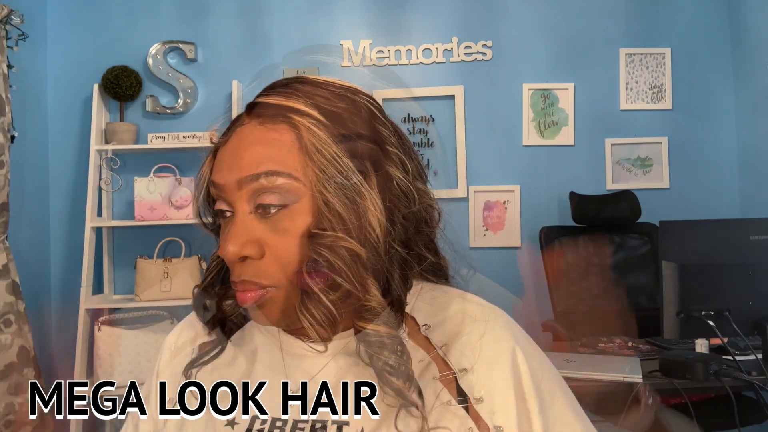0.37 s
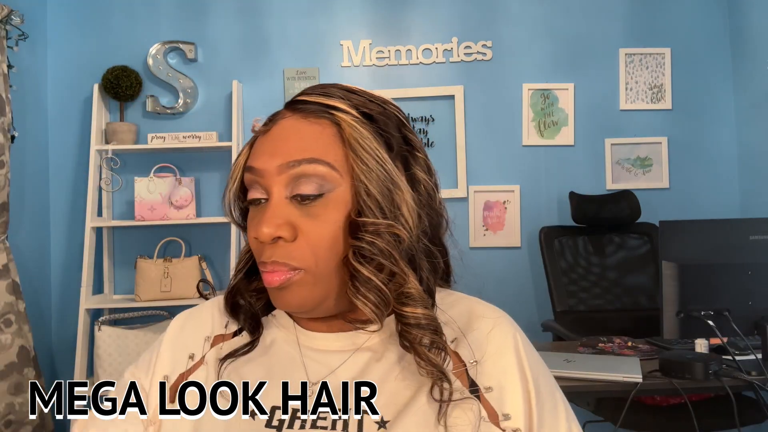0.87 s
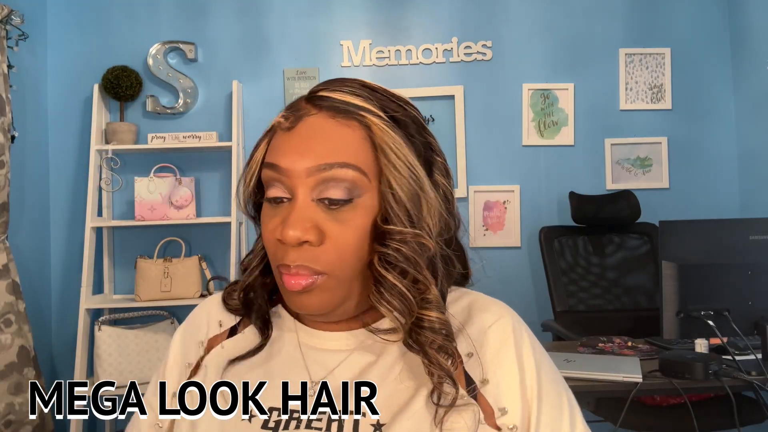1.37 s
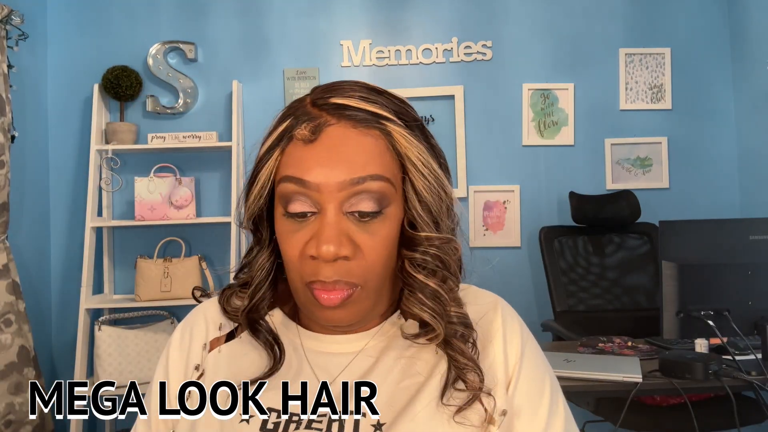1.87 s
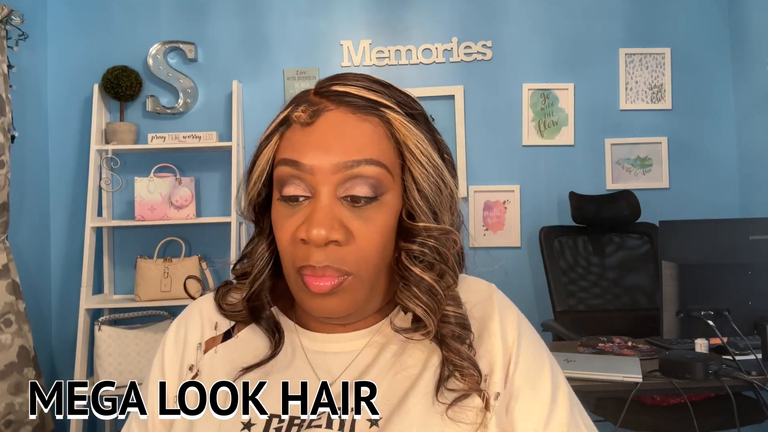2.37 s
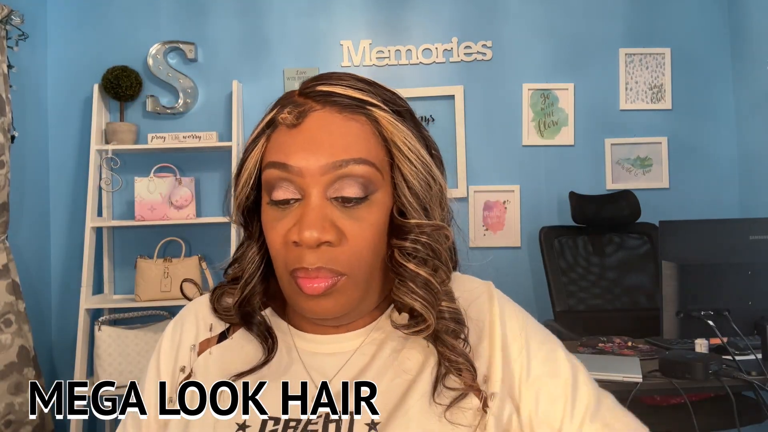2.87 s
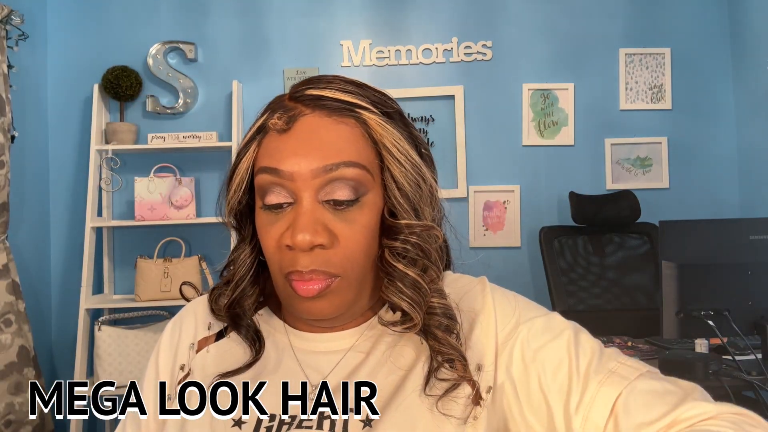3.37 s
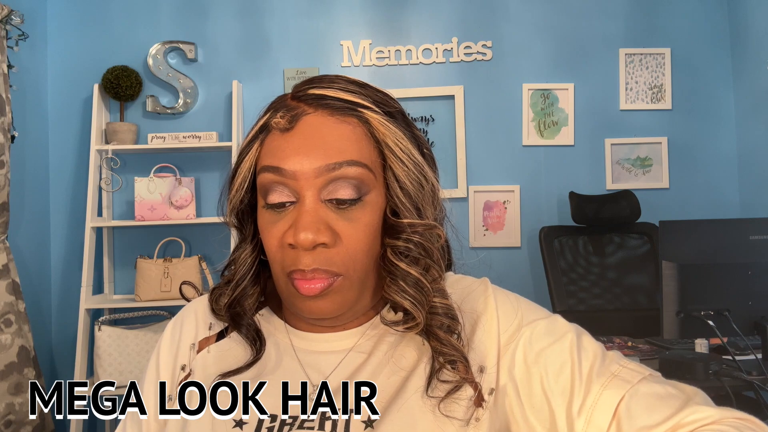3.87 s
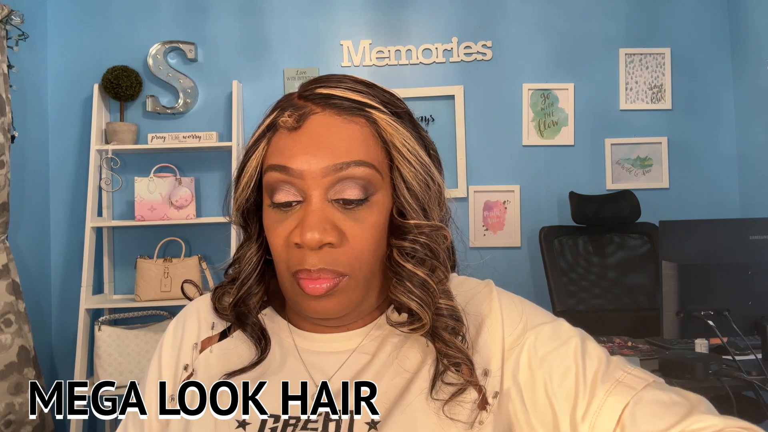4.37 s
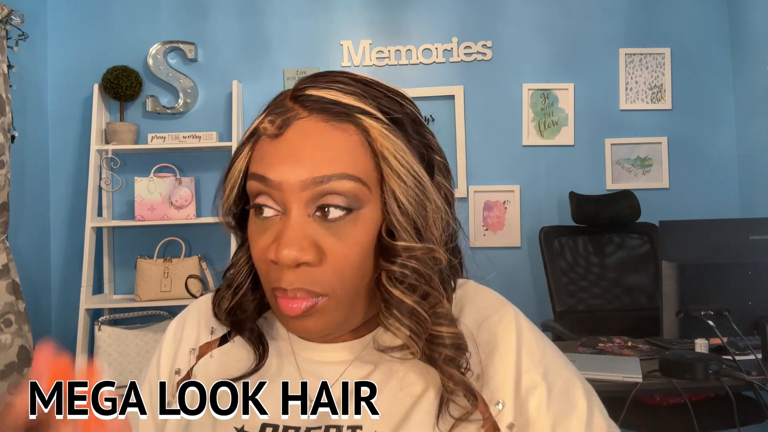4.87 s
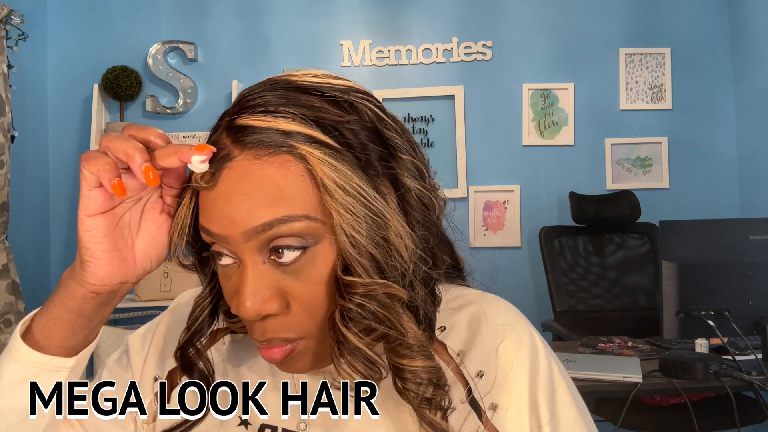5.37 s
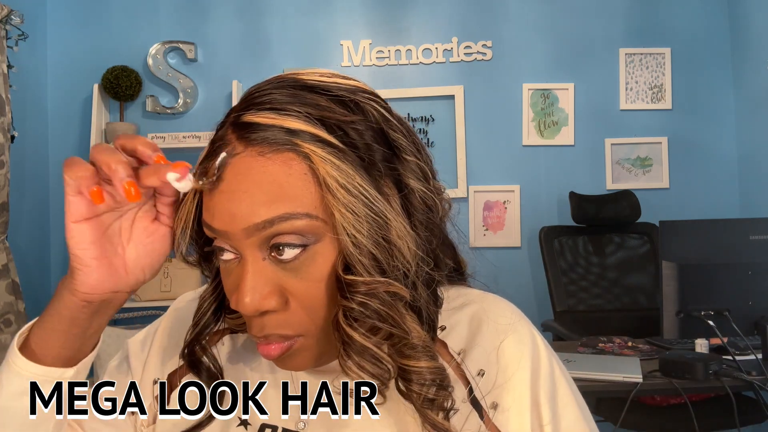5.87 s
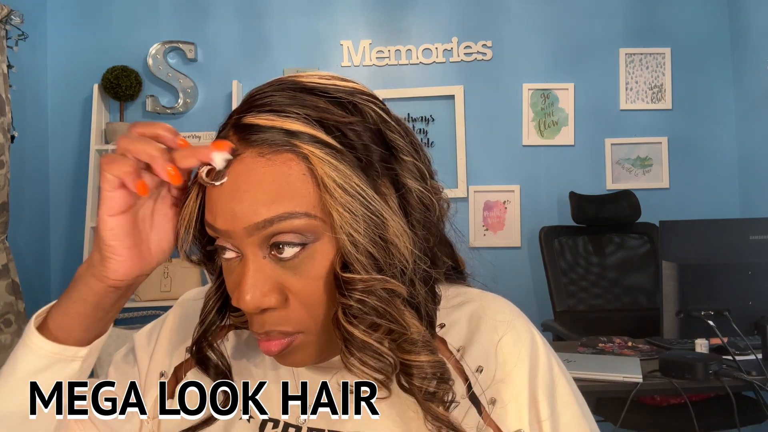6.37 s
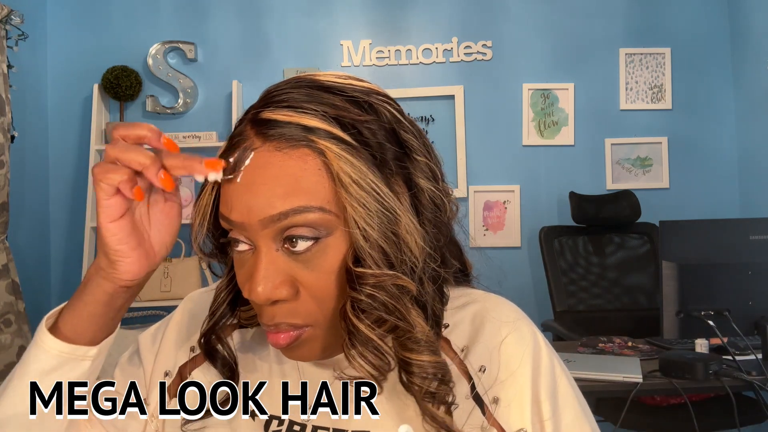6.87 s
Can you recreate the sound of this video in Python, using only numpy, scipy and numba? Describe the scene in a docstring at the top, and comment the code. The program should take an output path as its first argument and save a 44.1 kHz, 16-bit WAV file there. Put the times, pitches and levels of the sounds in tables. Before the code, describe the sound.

Close to a table in a quiet furnished room, light plastic ticks lead into busy rustling, scraping and small squeaks. A firm knock and then a hard jar set down with a brief ringing clack follow. Sparse clicks and a short scrape come later, then one low thud and faint hair strokes over a low hum.

```python
"""A wooden table top is knocked and dragged upon as small things are handled in a quiet furnished room.
Knocks excite its low modes and broad upper resonances; a jar and a plastic thing ring as modes of their own.
Rustling cloth, scrapes, fingers through hair and the noisy bursts and tails of knocks are shaped noise;
the plastic also squeaks as it slides. A low ventilation hum and a still hiss lie under all,
and the walls answer with decaying noise."""
import sys
import numpy as np
from scipy import signal
from scipy.fft import rfft, irfft, next_fast_len
from scipy.io import wavfile
from scipy.ndimage import map_coordinates
from numba import njit

SR = 44100
rng = np.random.default_rng(int(sys.argv[2]) if len(sys.argv) > 2 else 0)


def to_linear_factor(level_db):
    """Convert decibel levels (scalar or array-like) to linear amplitude factors."""
    exponent = np.asarray(level_db, float) / 20
    return 10 ** exponent


def waveform_to_disk(signal):
    """Save audio, clipped to [-1, 1], as 16-bit WAV at the path in sys.argv[1]."""
    frames = np.transpose(np.atleast_2d(signal))
    scaled = np.clip(frames, -1, 1) * 32767
    samples = np.round(scaled).astype(np.int16)
    wavfile.write(sys.argv[1], SR, samples)


N = 307818

# Knocks on the table; a knock may take several rows milliseconds apart, each one part of its contact.
# Each row: time in seconds, thump strength in dB, click strength in dB, click centre in Hz,
# click loss one octave off its centre in dB.
KNOCK_PARTS = [(0.294, -68, -69.5, 1500, 0.5), (0.757, -63.5, -25.5, 420, 17),
               (1.816, -31, -31.5, 2400, 23), (1.8345, -26, -30, 3500, 4.5),
               (1.8382, -23.5, -17, 1075, 18.5), (1.8403, -21.5, -14, 340, 8.5),
               (2.1536, -48.5, -45.5, 3000, 1), (2.1866, -37, -17, 2530, 6.5), (2.611, -41.5, -71, 3500, 7),
               (3.139, -44.5, -58.5, 800, 18), (5.3369, -22.5, -23.5, 1120, 6),
               (5.3382, -46, -23.5, 2370, 41), (5.34, -14.5, -28, 330, 4.5)]


def rms_one(x):
    """Normalisation: the mean power is scaled to 1."""
    return x / np.sqrt(np.mean(x ** 2) + 1e-30)


def at_hz(points, hz):
    """Logarithmic pitch: a table is interpolated on a log-frequency axis."""
    at, value = np.transpose(points)
    return np.interp(np.log(np.maximum(hz, 1)), np.log(at), value)


def drift(rate):
    """Band-limited chance: a smooth curve through random knots, rate of them a second, of spread about 1."""
    knots = rng.standard_normal(2000)
    return map_coordinates(knots, [np.arange(N) * rate / SR], order=3)


def ring(clicks, hz, t60):
    """Damped oscillator: a unit click starts a sine of height about 1 that loses 60 dB in t60 seconds."""
    r = to_linear_factor(-60 / (t60 * SR))
    w = 2 * np.pi * hz / SR
    return signal.lfilter([0, np.sin(w)], [1, -2 * r * np.cos(w), r * r], clicks + 1e-18)


@njit
def glide(x, hz, width_hz, sr):
    """Time-varying resonance: a two-pole filter whose centre moves, with gain near 1 on top."""
    y, r = np.zeros_like(x), np.exp(-np.pi * width_hz / sr)
    for n in range(2, len(x)):
        drive = (1 - r * r) / 2 * (x[n] - x[n - 2])
        y[n] = drive + 2 * r * np.cos(2 * np.pi * hz[n] / sr) * y[n - 1] - r * r * y[n - 2]
    return y


def pair(mid, side, hz):
    """Interchannel coherence: two unrelated sources mix so left and right are as alike as the table says."""
    # Each row: frequency in Hz, left-right likeness from -1 to 1.
    likeness = [(30, .93), (130, 0.94), (290, 0.49), (640, -0.17), (1500, .15), (5000, 0.28), (7500, -0.72),
                (8500, 0.79), (11500, 1), (13000, 0.2), (14500, -0.85)]
    alike = np.clip(at_hz(likeness, hz), -1, 1)
    return np.sqrt(1 + alike) * mid + np.sqrt(1 - alike) * side * [[1], [-1]]


def coloured(spectrum, source):
    """Spectral shaping: two sources are filtered to the given colour as a stereo pair of rms 1."""
    size = next_fast_len(N)
    hz = np.arange(size // 2 + 1) * SR / size
    inside = (hz > spectrum[0][0]) & (hz < spectrum[-1][0])
    mid, side = rfft(source, size) * to_linear_factor(at_hz(spectrum, hz)) * inside
    return rms_one(irfft(pair(mid, side, hz), size)[:, :N])


def grains(per_s, spread_db):
    """Stick-slip: random impulses of uneven size and sign, bunched in clumps, of rms 1."""
    born = rng.random(N) < per_s * to_linear_factor(5 * drift(30)) / SR
    size = to_linear_factor(spread_db * np.minimum(rng.exponential(1, N), 5))
    return rms_one(born * size * rng.choice([-1, 1], N))


def swell(s, peak_db, rise_s, fall_s, hold_s=0, sag_db=0):
    """Exponential growth and decay: power of each gesture, one row each, a value every 32 samples.

    rise_s and fall_s are the times for 20 dB; the level sags by sag_db over the hold."""
    age = np.arange(N // 32 + 2) * 32 / SR - s[:, None]
    rise_s, fall_s, hold_s = (np.maximum(v + 0 * s, .002)[:, None] for v in (rise_s, fall_s, hold_s))
    loss = np.maximum(-age / rise_s, 0) + np.maximum(age - hold_s, 0) / fall_s
    level_db = peak_db[:, None] - 20 * loss - sag_db * np.clip(age / hold_s, 0, 1)
    return to_linear_factor(2 * np.maximum(level_db, -150))


def summed(*powers, hz=None):
    """Power addition: gestures make one gain in time, or with hz a pitch averaged by their power."""
    power = np.vstack(powers)
    slow = np.sqrt(power.sum(0)) if hz is None else hz @ power / power.sum(0)
    return np.interp(np.arange(N) / 32, np.arange(len(slow)), slow)


def hum():
    """Broadband flow noise: the low rumble of air ducts wavers over a still hiss."""
    # Air ducts. Each row: frequency in Hz, relative level in dB per Hz.
    duct_colour = [(15, -50.5), (25, -24), (44, -7.5), (86, -5.5), (117, 0.5), (132, -7), (145, -10.5),
                   (178, -20), (265, -28), (409, -26.5), (448, -30.5), (499, -20), (574, -37.5),
                   (818, -40.5), (1000, -43), (1300, -75), (2200, -120)]
    # Still room and microphone hiss. Each row: frequency in Hz, relative level in dB per Hz.
    air_colour = [(410, -33), (700, -6), (873, -6), (919, -17.5), (1020, -8.5), (1780, -10.5), (3150, -14),
                  (3870, -15.5), (15500, -24.5)]
    rumble = coloured(duct_colour, rng.standard_normal((2, N))) * to_linear_factor(-58.5 + drift(3.3))
    return rumble + coloured(air_colour, rng.standard_normal((2, N))) * to_linear_factor(-84)


def noise_gains():
    """Envelope control: gains of hiss, swish and scrape, and the scrape's resonance in Hz."""
    # Rustles of cloth, and short noise bursts that go with knocks and ticks. Each row: peak time in seconds,
    # hiss level in dB, rise in seconds, fall in seconds, coarseness as scrape above hiss in dB.
    rustles = [(0.002, -74.5, .01, .06, 10), (0.61, -68.5, 0.019, .2, -12), (0.75, -67, 0.011, .08, -3.5),
               (1.029, -59, .065, .07, -9.5), (1.168, -53, .005, .07, -22.5),
               (1.259, -47.5, 0.044, 0.076, -6), (1.346, -48, .025, .045, -7.5),
               (1.437, -47.5, .01, .045, -4.5), (1.495, -49.5, 0.0072, .05, -1.5),
               (1.59, -64, 0.19, .05, -2), (1.624, -54.5, 0.0073, .05, -2.5), (1.704, -65, 0.12, .08, -7),
               (1.836, -48.5, .004, .1, -7), (2.045, -69.5, .2, .07, -4.5), (2.155, -56, 0.0019, .02, -5.5),
               (2.19, -51.5, 0.0051, .1, -1), (2.37, -70, .035, 0.092, -4.5), (2.532, -60.5, .075, .1, -9),
               (2.605, -66.5, .15, .08, -13.5), (2.73, -60.5, .04, .07, -12), (2.92, -84, .15, .1, 3),
               (3.708, -58.5, 0.0036, .05, -24.5), (3.821, -70.5, .15, 0.27, -10),
               (4.09, -66.5, .04, 0.079, -3.5), (4.185, -68.5, .09, .4, -12.5), (4.34, -62.5, .08, 0.11, 2),
               (4.722, -82.5, .3, .3, -14.5), (5.146, -80, 1.2, 1.2, -13), (5.63, -73, 0.24, .3, -17),
               (5.98, -80, .6, 0.76, -17.5), (6.64, -79, 0.36, .4, -22.5)]
    # Scrapes over the table, and the noisy ringing tails after hard knocks. Each row: peak time in seconds,
    # level in dB, rise in seconds, fall in seconds, resonance in Hz.
    scrapes = [(1.42, -49.5, 0.022, .03, 2100), (1.48, -52.5, 0.17, .03, 1820),
               (1.61, -59.5, 0.088, .12, 1550), (1.668, -55.5, 0.11, .08, 2250),
               (1.725, -58.5, 0.044, .12, 2330), (1.81, -58, 0.13, .2, 1700), (1.9, -53.5, .1, 0.16, 1415),
               (2.2, -46, 0.013, 0.14, 2430), (2.96, -81, .08, 0.52, 939.8), (1.24, -56.5, .012, .12, 1727),
               (4.011, -67.5, 0.11, .07, 2090), (4.098, -36, .01, .035, 1250), (4.15, -73, 0.048, .2, 1650)]
    # Fingers stroking through hair. Each row: contact time in seconds, hiss level in dB, rise in seconds,
    # length in seconds, swish above hiss in dB.
    strokes = [(5.659, -65, 0.044, 0.19, 3), (6.086, -60, 0.044, 0.077, 2),
               (6.414, -59.5, 0.013, 0.097, -1), (6.709, -60.5, 0.02, .12, -9)]
    hold_share = 0.11   # rustles and scrapes stay at their peak for this share of the fall time
    s, hiss_db, rise, fall, coarse_db = np.transpose(rustles)
    rustle = swell(s, hiss_db, rise, fall, hold_share * fall)
    rustle_swish = rustle * to_linear_factor(2 * (1 + .4 * coarse_db))[:, None]   # follows part of the coarseness
    rustle_scrape = rustle * to_linear_factor(2 * coarse_db)[:, None]
    rustle_hz = 1780 * 2 ** (-coarse_db / 40)   # coarser rows scrape lower, an octave per 40 dB

    s, scrape_db, rise, fall, resonance_hz = np.transpose(scrapes)
    scraped = swell(s, scrape_db, rise, fall, hold_share * fall)
    scraped_swish = scraped * to_linear_factor(2 * -12)

    s, hiss_db, rise, length, swish_db = np.transpose(strokes)
    lag_s, fall_s = 0.014, 0.084   # the swish opens after the first contact
    hair = swell(s, hiss_db, rise, fall_s, length, sag_db=3)
    # the swish thins faster along the stroke
    hair_swish = swell(s + lag_s, hiss_db + swish_db, rise + lag_s, fall_s, length - lag_s, sag_db=8.5)

    hiss_gain = summed(rustle, hair)
    swish_gain = summed(rustle_swish, scraped_swish, hair_swish)
    scrape_gain = summed(rustle_scrape, scraped)
    scrape_hz = summed(rustle_scrape, scraped, hz=np.r_[rustle_hz, resonance_hz])
    return hiss_gain, swish_gain, scrape_gain, scrape_hz


def granular_noise():
    """Granular noise: grains roughen it, dense for hiss, sparser in a moving resonance for scrape."""
    # Colours of three textures. Each row: frequency in Hz, relative level in dB per Hz.
    hiss = [(4120, -30.5), (7000, -5), (7410, -8), (9290, -5), (12300, -6.5), (14200, -8), (15500, -48.5)]
    swish = [(1470, -50), (2500, -19), (3320, -3.5), (4420, -1), (4810, -1), (6590, -3), (7200, -26),
             (9360, -50.5), (15800, -120)]
    scrape = [(530, -38.5), (900, -4), (1070, -10.5), (1350, 0.5), (1520, -5.5), (1760, -1.5), (1930, -9),
              (2520, -2), (3500, -4.5), (4550, -20), (7700, -120)]
    *gains, scrape_hz = noise_gains()
    flutter, out = drift(70), 0   # one flutter moves all three
    textures = [(hiss, 9000, .8), (swish, 5000, .8), (scrape, 1500, .7)]   # (colour, grains per s, smooth part)
    for (colour, per_s, smooth), gain in zip(textures, gains):
        roughness = smooth + abs(grains(per_s, 4.2))
        layer = coloured(colour, rng.standard_normal((2, N)) * roughness)
        if colour is scrape:
            resonant = np.array([glide(side, scrape_hz, 370.0, SR) for side in layer])
            layer = rms_one(0.26 * layer + resonant)
        if colour is swish:   # folds open and close, so a broad resonance wanders
            fold_hz = 4300 * 2 ** (.3 * np.clip(drift(9.9), -2, 2))
            resonant = np.array([glide(side, fold_hz, 900., SR) for side in layer])
            layer = rms_one(.7 * layer + resonant)
        out = out + layer * gain * to_linear_factor(0.58 * flutter + 1.9 * drift(25))
    return out


def knock_db(hz):
    """Excitation spectrum: strength of each row at one pitch, a low thump plus a click about its centre."""
    s, thump_db, click_db, click_hz, fall_db = np.transpose(KNOCK_PARTS)
    octaves = np.log2(hz / 150)   # the weight behind a knock fades above and below this pitch
    thump = to_linear_factor(thump_db - 10 * max(octaves, 0) - 3.5 * max(-octaves, 0))
    click = to_linear_factor(click_db - fall_db * np.log2(hz / click_hz) ** 2)
    return 20 * np.log10(np.hypot(thump, click))


def table():
    """Modal plate: knocks and drag ring the low modes; broad short resonances carry contact and chatter."""
    # Modes of the top. Each row: frequency in Hz, level against the knock's strength in dB, t60 in seconds.
    top_modes = [(72, -17, 0.23), (95, -14.5, .2), (121.74, -9, .17), (156.4, -11.5, .2),
                 (183, -11.5, 0.18), (237.1, -12, 0.17), (300.2, -20, 0.17), (326.7, -15.5, .12),
                 (415.5, -14, 0.17), (521, -14.5, 0.032), (627.7, -13.5, 0.083), (775, -15.5, .09),
                 (993, -18, 0.13)]
    # Weight dragged on the top. Each row: peak time in seconds, strength in dB, rise in seconds,
    # fall in seconds.
    drags = [(1.25, -64.5, 0.27, .3), (1.36, -57, 0.1, 0.027), (1.436, -50, 0.039, 0.13),
             (1.66, -57.5, 0.28, 0.14), (2.926, -67.5, .03, 0.32), (3.136, -66, 0.07, 0.094),
             (3.717, -65, 0.011, .03), (4.129, -58.5, 0.094, 0.032), (4.353, -69, 0.083, 0.15)]
    start_s, out = np.array(KNOCK_PARTS)[:, 0], np.zeros((2, N))
    # contact resonances last 6.2 cycles and weaken below 1100 Hz
    cracks = [(hz, -4.5 - 7.4 * max(np.log2(1100 / hz), 0), 6.2 / hz)
              for hz in np.geomspace(280, 11000, num=15)]
    drag = summed(swell(*np.transpose(drags))) * grains(700, 4.0)
    t = np.arange(int(.25 * SR)) / SR
    for k, (hz, level_db, t60) in enumerate(top_modes + cracks):
        delay_s = 0.0036 * np.sqrt(100 / hz)   # bending waves are slower in the bass
        at = np.round((start_s + delay_s) * SR).astype(int)
        force = np.zeros((2, N))
        force[:, at] = to_linear_factor(knock_db(hz) + level_db + rng.normal(0, 1.2, len(at)))
        if k >= len(top_modes):   # the dense upper modes are heard as dying noise
            noise = pair(*rng.standard_normal((2, len(t))), hz)
            chatter = 0.21 * min(1, (hz / 1500) ** .4) * noise * to_linear_factor(-60 * t / 0.068)
            force = force + signal.oaconvolve(force, chatter, axes=1)[:, :N]
            band = signal.butter(1, [hz / 2, min(2 * hz, 20000)], "band", fs=SR, output="sos")
            force = signal.sosfilt(band, force)
        else:
            force = force + drag * to_linear_factor(level_db - 18.5 - 7.4 * abs(np.log2(hz / 500)))
        out += ring(force, hz, t60) * (-1) ** k   # alternate modes move in opposite phase
    return out * to_linear_factor(np.array([[-.6], [.6]]))   # a little to the right


def plastic():
    """Modal impact and stick-slip: ticks ring the plastic; sliding squeaks at a gliding pitch and overtone."""
    # Ticks. Each row: time in seconds, strength in dB, treble tilt in dB per two octaves,
    # left above right in dB.
    ticks = [(0.456, -59.5, -11, 7), (0.471, -53, -19, 6), (0.5686, -46, -12, 3), (0.6022, -31, -18, 4),
             (0.75, -41, -4.5, 6), (1.0036, -43.5, -5, 9), (1.0355, -69, 1, 10.5), (1.17, -50, -8, 3),
             (1.183, -43.5, 11, 2), (1.2804, -39, -4, -8.5), (1.3365, -37.5, 9.5, -6),
             (1.4197, -36, -10, -4), (1.4382, -50, 9, 7), (1.495, -51, -7, -5.5), (1.6205, -39, 11.5, 3),
             (1.6615, -35, -9, -11), (2.5369, -43, 4.5, -5), (2.589, -45, -2, -0.5), (3.297, -43, -29, 4.5),
             (3.4444, -64, -12.5, 5), (3.7162, -50.5, -2.5, -1), (3.7214, -29.5, -6, 5.5),
             (3.896, -46.5, -14, 6.5), (3.932, -51, 4, 2), (3.9453, -47.5, -23, 2), (3.9803, -56, 3, -4),
             (3.9914, -67, -8, 10.5), (4.0678, -46, -12, -2), (4.438, -50.5, -9.5, -1.0),
             (4.4755, -48, -20, 0.5), (4.504, -48, -23, -3), (6.0754, -54, 3.5, 1), (6.4103, -59.5, 6, 0.5),
             (6.7116, -65, 3, -0.5)]
    # Modes. Each row: frequency in Hz, level against the tick's strength in dB, t60 in seconds.
    plastic_modes = [(1700, -27.5, 0.0048), (2220, -24, 0.02), (2810, -13.5, 0.023), (3520, -11.5, 0.0074),
                     (5500, -12.5, 0.0078), (9180, -12, 0.016), (10450, -12.5, 0.015), (13200, -11, 0.0046),
                     (6160, -7, 0.00087)]
    # Squeaks. Each row: peak time in seconds, level in dB, rise in seconds, fall in seconds, pitch in Hz.
    squeaks = [(1.352, -45, .015, .03, 3620), (1.436, -69, .04, 0.12, 2640), (1.664, -57, .01, 0.09, 2520),
               (1.79, -77, .3, .05, 2490), (2.56, -70.5, .25, 0.17, 2606), (2.732, -79, .06, .16, 2774),
               (2.86, -86.5, .08, .1, 2700), (3.302, -81.5, .035, 0.036, 2915),
               (3.713, -62, 0.0085, .4, 2786), (3.833, -69.5, 0.1, 0.17, 2810), (3.95, -83, 0.12, .1, 3040),
               (4.04, -71, 0.058, 0.062, 3220), (4.15, -68, .1, 0.042, 2810),
               (4.354, -77.5, .045, 0.061, 2926), (4.51, -72, 0.024, 0.022, 2864)]
    s, peak_db, treble_db, pan_db = np.transpose(ticks)
    at = np.round(s * SR).astype(int)
    out, chance_db = np.zeros((2, N)), rng.normal(0, 2.5, (len(s), len(plastic_modes)))
    for k, (hz, level_db, t60) in enumerate(plastic_modes):
        tilt_db = treble_db * np.log2(hz / 2800) / 2
        clicks = np.zeros((2, N))
        clicks[:, at] = to_linear_factor(peak_db + level_db + tilt_db + chance_db[:, k] + pan_db * [[.5], [-.5]])
        out += ring(clicks, hz, t60) * (-1) ** k

    *gesture, pitches = np.transpose(squeaks)
    power = swell(*gesture)
    squeak_hz = summed(power, hz=pitches)
    slips = grains(2500, 2.5)
    squeak = rms_one(glide(glide(slips, squeak_hz, 360.0, SR), squeak_hz, 360.0, SR))
    upper_hz = 3.2 * squeak_hz
    overtone = rms_one(glide(glide(slips, upper_hz, 1300.0, SR), upper_hz, 1300.0, SR))
    return out + summed(power) * (squeak + to_linear_factor(-8.5) * overtone)


def jar():
    """Modal radiation: each mode sounds from its own part of the wall, so the sides differ in arrival time."""
    # A hard jar lands and bounces. Each row: time in seconds, strength in dB.
    landings = [(2.1867, -6), (2.1981, -20.5)]
    # Modes. Each row: frequency in Hz, level against the landing's strength in dB, t60 in seconds.
    jar_modes = [(1035, -16.5, 0.2), (1170, -0.5, 0.013), (1121, -15, 0.11), (1210, -20, .07),
                 (1333, -15.5, 0.1), (1418, -18, .12), (1725, -24.5, 0.12), (2042, -24.5, 0.12),
                 (2284.7, -25.5, .08), (2400, -29.5, 0.2572), (2333, -23, .12), (2460, -14.5, 0.074),
                 (2635, -27.5, 0.11), (4318, -33.5, 0.075)]
    s, peak_db = np.transpose(landings)
    clicks, out = np.zeros(N), np.zeros((2, N))
    clicks[np.round(s * SR).astype(int)] = to_linear_factor(peak_db)
    for k, (hz, level_db, t60) in enumerate(jar_modes):
        sound = to_linear_factor(level_db) * ring(clicks, hz, t60)
        shift = round(5.5 * np.sin(1.5 * k))   # samples, earlier or later on the right
        out += [sound, np.roll(sound, shift)]
    return signal.sosfilt(signal.butter(2, 600, "high", fs=SR, output="sos"), out)   # the jar's rings carry no bass below 600 Hz


def room(x):
    """Diffuse reverberation: the walls answer with noise whose decay time depends on pitch."""
    # Each row: frequency in Hz, t60 in seconds.
    decay = [(100, 0.16), (500, 0.31), (2000, 0.19), (5000, .2), (12000, 0.36)]
    t, tail = np.arange(int(.45 * SR)) / SR, 0
    for hz in np.geomspace(90, 11500, num=8):
        band = signal.butter(2, [hz / np.sqrt(2), hz * np.sqrt(2)], "band", fs=SR, output="sos")
        mid, side = signal.sosfilt(band, rng.standard_normal((2, len(t))))
        tail = tail + pair(mid, side, hz) * to_linear_factor(-60 * t / at_hz(decay, hz))
    tail = tail * np.clip(t / 0.0059 - 1, 0, 1)   # first walls answer after 5.9 ms
    tail = tail / np.sqrt(np.sum(tail ** 2) / 2)
    return signal.fftconvolve(x.mean(0, keepdims=True), tail, axes=1)[:, :N]


def scene():
    """Superposition: hits and, more weakly, the granular noise reach the walls; the hum joins them."""
    hits, noise = table() + jar() + plastic(), granular_noise()
    return hits + noise + to_linear_factor(-6) * room(hits + 0.13 * noise) + hum()


def roll_off(x):
    """The treble ends steeply here."""
    return signal.sosfilt(signal.butter(12, 16090, fs=SR, output="sos"), x)


def record(dry):
    """High-pass response: the microphone cuts the deep bass below 44 Hz."""
    cut = signal.sosfilt(signal.butter(2, 44, "high", fs=SR, output="sos"), dry)
    return roll_off(cut)


dry = scene()
out = record(dry)
waveform_to_disk(out)
```